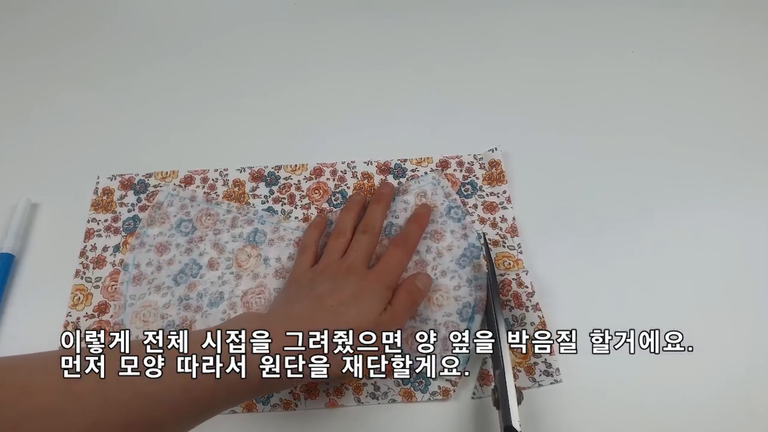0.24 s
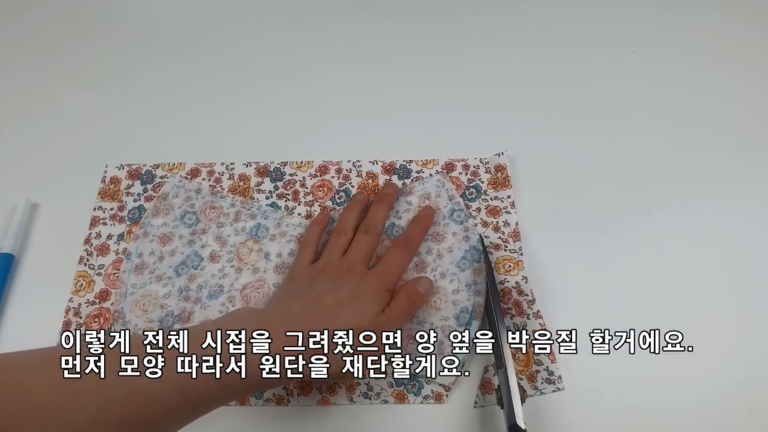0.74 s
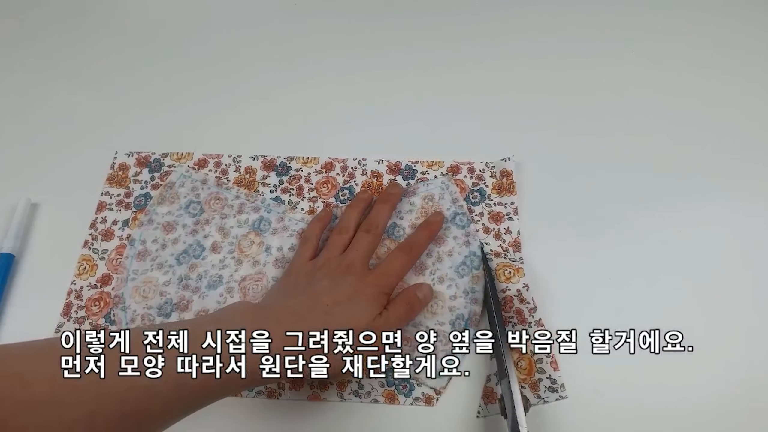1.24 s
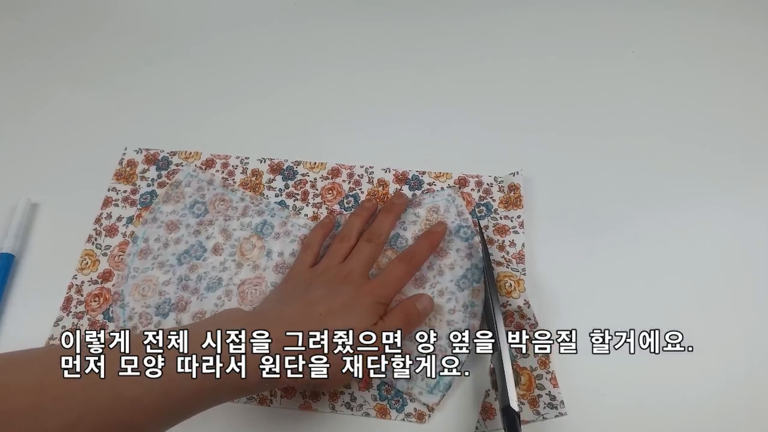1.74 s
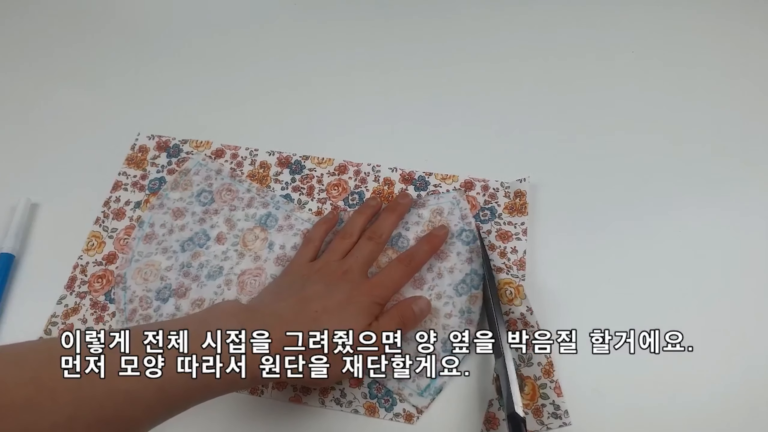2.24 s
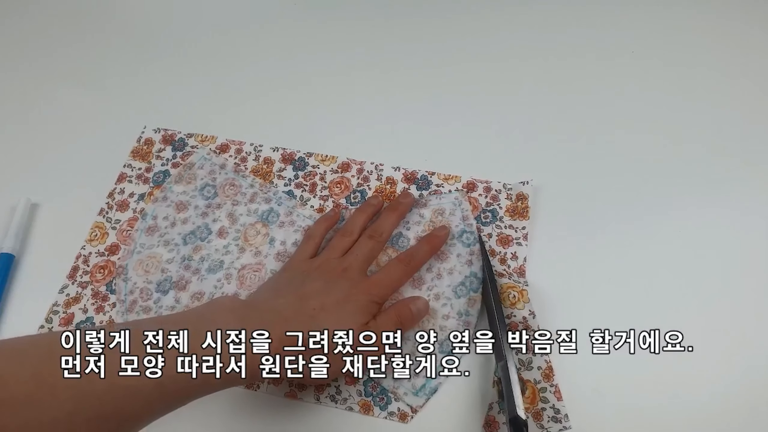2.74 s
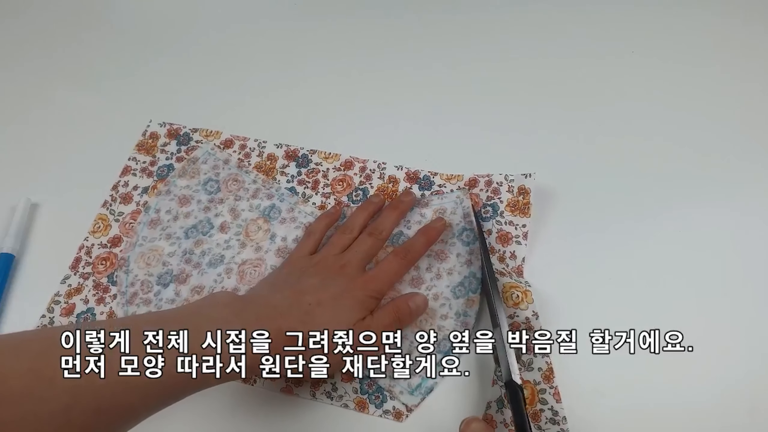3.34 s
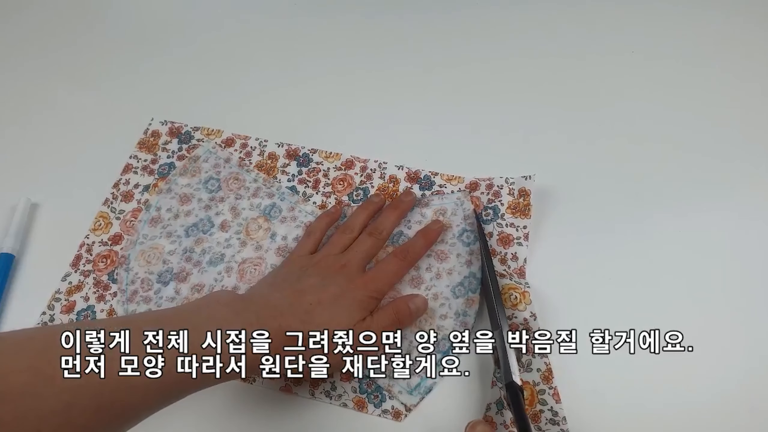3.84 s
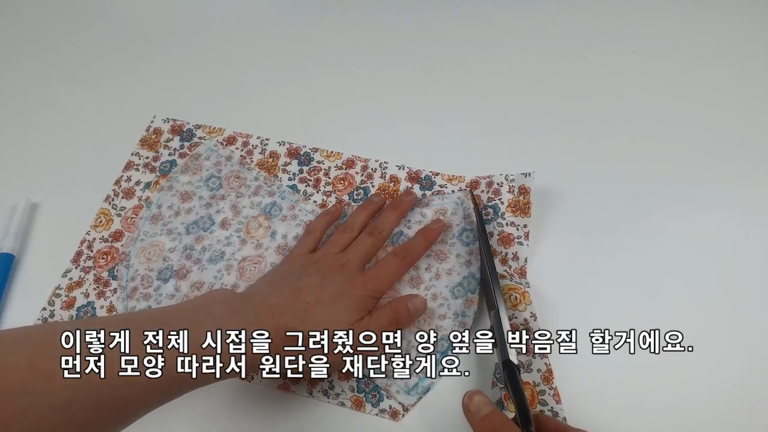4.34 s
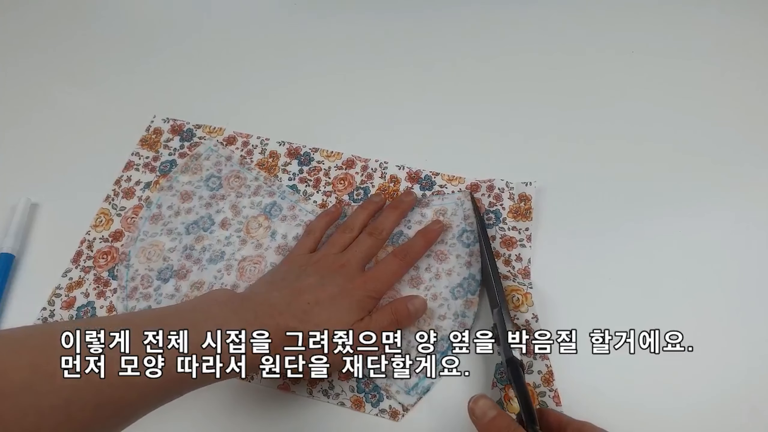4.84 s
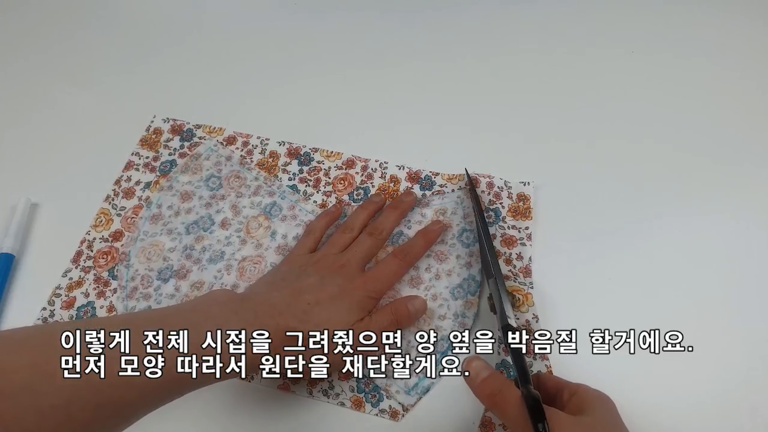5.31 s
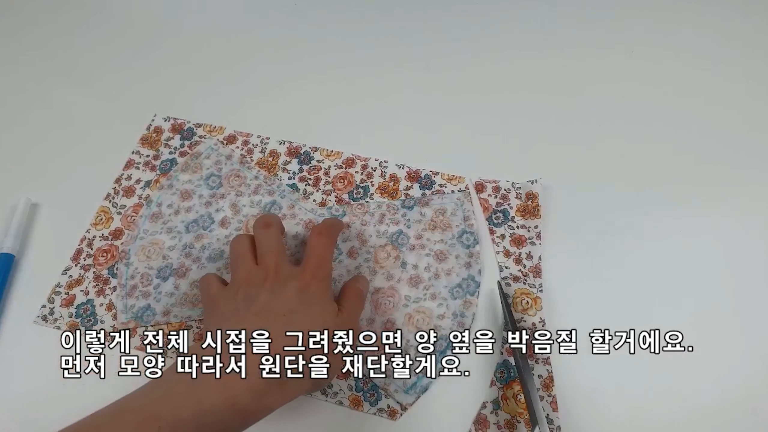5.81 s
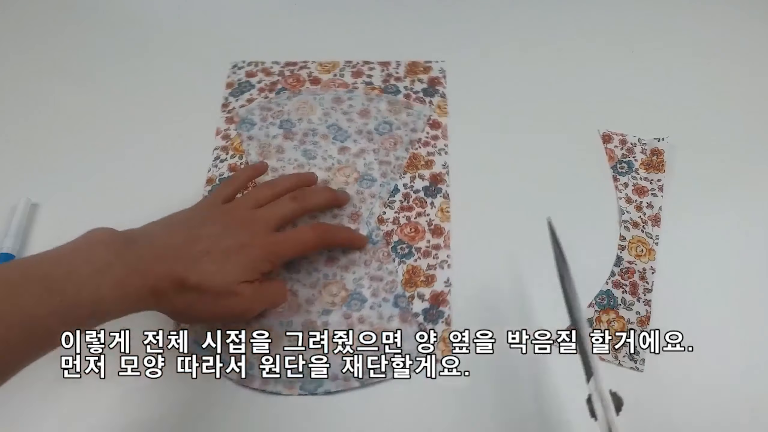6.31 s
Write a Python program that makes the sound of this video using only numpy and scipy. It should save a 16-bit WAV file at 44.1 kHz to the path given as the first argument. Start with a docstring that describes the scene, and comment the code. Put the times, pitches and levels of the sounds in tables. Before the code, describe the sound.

Close, uneven scissor cuts crackle through fabric and rattle a tabletop over low rumble, ending in a hard knock and a short cloth rub.

```python
"""A low rumble and puffs of air at the left port are heard first, over faint room hum and hiss.
Scissors on a hollow table then cut cotton in jerks: bursts of random thread snaps excite the damped modes
of table top and blades, with fibre crackle. Between cuts the blades reopen with a scrape and a knock.
Brushing and, near the end, sliding cloth are filtered noise; the rumble is noise around a low table mode."""
import sys
import numpy as np
from scipy import signal
from scipy.fft import rfft, irfft
from scipy.io import wavfile
from scipy.ndimage import uniform_filter1d

SR = 44100
rng = np.random.default_rng(int(sys.argv[2]) if len(sys.argv) > 2 else 0)


def transcribe(signal):
    """Save signal, clipped to [-1, 1], as a 16-bit WAV file at the path in sys.argv[1]."""
    frames = np.atleast_2d(signal).T
    limited = np.clip(frames, -1, 1)
    pcm = np.round(limited * 32767).astype(np.int16)
    wavfile.write(sys.argv[1], SR, pcm)


N = 289737
T = np.arange(N) / SR  # time [s]

# rumble of the lowest table mode: t/s, level/dB
RUMBLE_LEVEL = [(0.0, -41.5), (0.46, -70.5), (0.71, -49), (0.86, -64.5), (1.35, -45), (1.39, -61.5),
                (2.23, -54), (2.27, -55.5), (2.65, -46), (2.78, -59.5), (3.42, -64), (4.06, -47),
                (4.24, -65.5), (4.87, -52), (5.38, -63), (5.49, -39.5), (5.56, -55), (6.57, -50)]
# room spectrum: f/Hz, relative level/dB
ROOM_TONE = [(65, -36), (110, -2.5), (147, -24.5), (266, -17.5), (334, -34), (380, -19.5), (430, -33.5),
             (840, -33.5), (1500, -41), (2500, -44.5), (5200, -46), (7000, -56.5), (11500, -55),
             (13000, -73.5)]
# left-right correlation of the room sound: f/Hz, correlation [0 to 1]
ROOM_LIKENESS = [(100, .85), (300, .8), (1000, .4), (4000, .1), (15000, 0)]
ROOM_DB = -65.5  # rms
# puffs of air: t/s of centre, level/dB at the left port, f/Hz
AIR_PUFFS = [(.009, -32.5, 58), (0.071, -36, 60), (0.106, -34.5, 60), (0.149, -37.5, 59.5),
             (1.667, -35, 61.4), (1.73, -41, 59), (1.753, -34, 62.4), (1.8, -35.5, 81), (1.82, -33, 54.6),
             (2.11, -32.5, 62), (2.194, -43, 60.8), (3.23, -43, 58.5), (5.169, -41.5, 59.6),
             (6.378, -48, 60.6)]

# blades reopening: t/s of peak, scrape level/dB, knock level/dB (both as drive of the table)
OPENINGS = [(0.012, -43, -39.5), (1.454, -45.5, -40.5), (2.885, -53, -36.5), (4.233, -48.5, -41.5),
            (5.058, -50, -34)]
# colour of the opening scrape: blade ring, crackle, low thud [level/dB re table]
OPENING_COLOUR = [-22, -47, -5.5]
OPEN_RISE_S, OPEN_FALL_S = 60 / 724, 60 / 293
KNOCK_SWELL_S, KNOCK_DECAY_S, KNOCK_BRIGHT_DB = 0.0093, 0.005, -32  # time constants; brightness re table
# jerks of the blades: t/s of peak, table drive level/dB, brightness [dB re table], decay time constant [s]
JERKS = [(.632, -41.5, -33, 0.0045), (.675, -38, -21, 0.0058), (0.702, -59, -3, 0.013),
         (0.724, -45, -6, 0.0016), (0.876, -43, -35, 0.0046), (0.923, -47, -17, 0.017),
         (0.963, -35, -14, 0.0033), (1, -52, -2, .003), (1.063, -39.5, -10, 0.0034),
         (1.089, -46, -10, 0.0024), (1.145, -37.5, -10, 0.0034), (1.179, -29.5, -16, 0.0042),
         (1.214, -31.5, -12.5, 0.0067), (1.24, -31, -10.5, 0.0025), (1.273, -43, -8.5, 0.012),
         (1.305, -25.5, -10.5, 0.0059), (2.01, -38, -33, 0.0032), (2.035, -43, -9, 0.005),
         (2.099, -30, -21.5, 0.0043), (2.187, -42.5, -11.5, 0.0081), (2.348, -42.5, -16.5, 0.0057),
         (2.414, -30.5, -15.5, 0.0025), (2.445, -30.5, -19, 0.0058), (2.566, -30.5, -14, .0025),
         (2.595, -30, -19.5, 0.0043), (2.648, -27, -9.5, 0.0045), (2.704, -25, -9.5, 0.0041),
         (3.541, -45.5, -24, 0.0052), (3.68, -46, -9, 0.0027), (3.754, -34, -13, 0.0011),
         (3.769, -42, -9, 0.0059), (3.793, -37.5, -8.5, 0.0026), (3.849, -36.5, -12, 0.0069),
         (3.894, -38.5, -11.5, 0.0039), (3.923, -42, -4, 0.0036), (3.949, -30.5, -9, 0.0045),
         (3.967, -48, -7, .003), (3.989, -28, -12.5, 0.0034), (4.017, -42, -5.5, 0.0021),
         (4.05, -28.5, -12.5, 0.0017), (4.11, -39, -5, 0.0016), (4.702, -44, -21.5, 0.0073),
         (4.767, -27.5, -17, 0.0026), (4.781, -41.5, -16, 0.028), (4.82, -34.5, -15, 0.0075),
         (4.846, -22, -15, 0.0019), (4.878, -23.5, -14.5, 0.0066), (4.91, -29.5, -8.5, 0.0044),
         (5.414, -22, -44, 0.0024), (5.463, -18.5, -20.5, 0.0055)]
JERK_SWELL_S, CRACKLE_DB, THUD_DB = .0022, -6, -16.5  # crackle re blade ring, low thud re table
# closing strokes, shearing steadily under the jerks: t/s of start, length [s],
# table drive level/dB at start and at end, blade ring, fibre crackle and low thud [level/dB re table]
STROKES = [(.64, 0.081, -52.5, -48, -12.5, -26, -7.5), (.781, 0.062, -50, -58.5, -12, -35, -17),
           (0.849, 0.13, -58.5, -48.5, -6, -30, -13), (1.056, 0.3, -63, -52, -8, -17, -8),
           (1.974, 0.098, -49.5, -58.5, -16, -27, -5.5), (2.093, 0.09, -57, -55.5, -7, -24, -15),
           (2.345, .1, -66, -57, -11, -22, -5), (2.561, 0.17, -58, -50, -13.5, -20, -8),
           (3.51, 0.042, -70.5, -60, -19.5, -39, -3), (3.67, 0.025, -65, -68, -6.5, -33, -11),
           (3.754, 0.027, -53.5, -56.5, -6, -25, 4.5), (3.849, 0.176, -62, -48.5, -9.5, -12, -2.5),
           (4.64, 0.071, -66, -61.5, -28, -32, -8), (4.703, 0.025, -61, -61.5, -11, -28, -1),
           (4.762, 0.12, -53, -40.5, -10, -12, -3), (5.376, 0.022, -59.5, -53, -9.5, -26, 4),
           (5.412, 0.048, -34, -29, -15, -14.5, -12)]
BITE_S, LET_GO_S = 60 / 1999, 60 / 379
# single blows (blade tips meet, a tick, a hand lands):
# t/s, impulse level/dB into table top, blades, air, low modes
BLOWS = [(5.468, 3, 1.5, -3.5, -11.5), (5.854, -54, -43.5, -54, -48), (5.942, -11, -49.5, -67, -7.5)]
# rubbing heard through the table: t/s, drive level/dB
RUBBING = [(5.96, -38), (6.034, -54), (6.16, -52.5), (6.208, -58.5), (6.364, -59.5), (6.558, -75.5),
           (6.57, -71.5)]
# table-top modes: nominal f/Hz, relative level/dB, t60 [s], lean to the left port
# (in all mode tables, beyond +-1 the ports move in opposite phase)
TABLE_MODES = [(618, -17.5, 0.18, 0.3), (530, -3, 0.031, 0.091), (638, -6.5, 0.13, -1.4),
               (708, -4, 0.22, 1), (759.2, 6, 0.13, 0.18), (790, 6, 0.12, -.4), (784, 10.5, 0.023, 0.23),
               (955, -3, 0.057, -0.14), (982, 9, 0.036, -0.59), (1102, 3, 0.049, -0.01),
               (1124, 0.5, 0.068, -0.72), (1212, 8.5, 0.014, -.3), (1288, -3.5, 0.12, .2),
               (1508, -17, 0.039, -0.018), (1524, -5, 0.059, .2), (1720, -10.5, 0.042, .2)]
# low modes of the table: nominal f/Hz, relative level/dB, t60 [s], lean to the left port
LOW_MODES = [(139.5, -2.5, .1, -0.02), (207.6, 4, 0.26, .05), (280.5, -2.5, 0.12, .05),
             (332, -3.5, .15, -0.067), (499.8, -3, 0.15, .2)]
# blade modes: nominal f/Hz, relative level/dB, t60 [s] (3 ms at least when rung), lean to the left port
BLADE_MODES = [(2204, -3.5, 0.012, 0.14), (2250, -10, 0.0025, -0.57), (2685, 5.5, 0.011, 0.047),
               (2980, 7, 0.011, -0.23), (3350, -3.5, 0.016, .2), (4450, -2.5, 0.0042, 0.54),
               (4870, -1, 0.0089, 0.26), (5000, 2, 0.014, 0.23), (6682, -6, 0.0031, .3)]
# fibre crackle spectrum: f/Hz, relative level/dB
CRACKLE_TONE = [(1060, -56.5), (1800, 0.5), (1990, -17.5), (2850, 0.5), (3570, -13.5), (4670, -2.5),
                (5540, -32), (7530, -1.5), (11500, -2.5), (13900, -1), (15500, -24.5)]

# faint brushing while the cloth is nudged round between cuts: t/s of peak, level/dB
BRUSHES = [(.25, -72.5), (1.6, -73), (3.1, -77), (5.26, -74.5)]
# brushing spectrum: f/Hz, relative level/dB
BRUSH_TONE = [(1500, -4.5), (3000, -13), (6000, -6), (8000, -11), (15000, -24.5)]
BRUSH_RISE_S, BRUSH_FALL_S = 60 / 39, 60 / 58.5
# hiss of cloth sliding: t/s, level/dB
SLIDE_LEVEL = [(5.92, -85), (5.934, -86), (5.946, -71), (6.006, -56.5), (6.144, -55.5), (6.226, -61),
               (6.408, -59.5), (6.434, -69), (6.5, -87.5)]
# sliding spectrum: f/Hz, relative level/dB
SLIDE_TONE = [(710, -43), (1200, -1.5), (1570, 0.5), (2560, -5.5), (3460, -6.5), (13300, -13.5),
              (14800, -18.5), (15500, -53.5)]
EDGE_HZ = 15300  # upper band limit


def amp(db):
    """Amplitude ratio of a level: 20 dB is a factor of ten."""
    return 10 ** (np.asarray(db) / 20)


def evened(x):
    """Normalization to unit root-mean-square."""
    return x / np.sqrt(np.mean(x ** 2) + 1e-20)


def read(points, hz):
    """Interpolation on a logarithmic frequency axis."""
    f, value = np.transpose(points)
    return np.interp(np.log(hz + 1), np.log(f + 1), value)


def add(mix, s, sound):
    """Superposition: a sound is added in place from time s, trimmed to the mix."""
    start = round(s * SR)
    sound = sound[..., max(-start, 0):]
    part = mix[..., max(start, 0):][..., :sound.shape[-1]]
    part += sound[..., :part.shape[-1]]


def curve(rows):
    """Envelope linear in decibels between its points, silent outside them, then smoothed."""
    s, db = np.transpose(rows)
    inside = (T >= s[0]) * (T <= s[-1])
    return uniform_filter1d(amp(np.interp(T, s, db)) * inside, size=300)


def swell(start, length, from_db, to_db, rise_s, fall_s):
    """Exponential growth up to the start, a drift while it holds, then exponential decay."""
    end = start + max(length, 1e-4)
    return curve([(start - rise_s, from_db - 61), (start, from_db), (end, to_db), (end + fall_s, to_db - 60)])


def coloured(x, tone):
    """Linear filtering: shapes the spectrum, keeping unit power for unit white noise."""
    gain = amp(read(tone, np.fft.rfftfreq(N, 1 / SR)))
    return irfft(rfft(x) * evened(gain), N)


def rumble():
    """Resonance under random drive: the lowest table mode, kept going by hands, blades and building tremor."""
    common, opposed = rng.standard_normal((2, N))
    hz = np.fft.rfftfreq(N, 1 / SR)
    resonance = 1 / (1 + ((hz - 88) / 14) ** 2)
    ports = np.array([common + .2 * opposed, common - .2 * opposed])
    return evened(irfft(rfft(ports) * resonance, N)) * curve(RUMBLE_LEVEL)


def room():
    """Partial coherence: hum and hiss share part of their noise between ports, in drifting patches."""
    frames, hz = N // 256 + 5, np.fft.rfftfreq(1024, 1 / SR)
    a, b, c, d, patches = rng.standard_normal((frames, 513, 5)).T
    patches = uniform_filter1d(patches, size=8, axis=0)  # over frequency
    patches = evened(uniform_filter1d(patches, size=10, axis=1))  # over time
    same = read(ROOM_LIKENESS, hz)[:, None]
    left, other = a + 1j * b, c + 1j * d
    spectra = np.array([left, same * left + np.sqrt(1 - same ** 2) * other])
    spectra *= amp(read(ROOM_TONE, hz)[:, None] + 1.7 * patches) * (hz > 60)[:, None]
    noise = signal.istft(spectra, nperseg=1024, noverlap=768)[1][:, :N]
    return amp(ROOM_DB) * evened(noise)


def puffs():
    """Forced motion: each puff swings the left diaphragm for about two cycles, the right a tenth as far."""
    out = np.zeros((2, N))
    for s, db, hz in AIR_PUFFS:
        u = np.linspace(-1, 1, round(2.6 * SR / hz))
        swing = -np.cos(np.pi * 2.6 * u) * np.cos(np.pi * u / 2) ** 2
        add(out, s - len(u) / SR / 2, amp(db) * swing * np.array([[1], [.1]]))
    return out


def force():
    """Impulsive force: each knock or jerk swells and decays exponentially, as table and bright gains."""
    out, t = np.zeros((2, N)), np.arange(-SR // 20, SR // 10) / SR
    rows = [(s, db, KNOCK_BRIGHT_DB, KNOCK_DECAY_S, KNOCK_SWELL_S) for s, _, db in OPENINGS]
    rows += [(*row, JERK_SWELL_S) for row in JERKS]
    for s, db, bright_db, decay, rise in rows:
        shape = np.exp(np.where(t < 0, t / rise, -t / decay))
        add(out, s + t[0], amp(db) * shape * amp([[0], [bright_db]]))
    return out


def shearing():
    """Steady friction of openings and strokes, as gains into table, blades, air and low modes."""
    out = np.zeros((4, N))
    for s, db, _ in OPENINGS:
        scrape = swell(s, 0, db, db, OPEN_RISE_S, OPEN_FALL_S)
        out += scrape * amp([0] + list(OPENING_COLOUR))[:, None]
    for s, length, from_db, to_db, *colour_db in STROKES:
        stroke = swell(s, length, from_db, to_db, BITE_S, LET_GO_S)
        out += stroke * amp([0] + colour_db)[:, None]
    return out


def blows(column):
    """Impulse excitation: one unit sample, scaled, for each blow."""
    out = np.zeros(N)
    for s, *db in BLOWS:
        add(out, s, amp(db[column]) * np.ones(1))
    return out


def thread_snaps():
    """Shot noise: threads snap one by one at random, about 7000 a second, with uneven strength."""
    size = amp(2.0 * rng.exponential(1, N)) * (rng.random(N) < 7000 / SR)
    return evened(size * rng.standard_normal(N))


def ring(drive, modes, spread_db, detune, count=7):
    """Modal superposition: damped modes at both ports, several mixes taking turns as the contact wanders."""
    t, out = np.arange(SR // 3) / SR, np.zeros((2, N))
    share = np.abs(uniform_filter1d(rng.standard_normal((count, N)), size=1500, axis=1)) ** 4
    share /= np.linalg.norm(share, axis=0)
    # the first wave spreads away from the contact before the ringing settles
    early = 1 + 0.42 * np.exp(-t / 0.00089)
    for part in share:
        response = np.zeros((2, len(t)))
        for k, (hz, db, t60, lean) in enumerate(modes):
            gain, shift = rng.standard_normal(2)
            t60 = max(t60, .003)
            decay = amp(db + spread_db * gain - 60 * t / t60)
            mode = decay * np.sin(2 * np.pi * hz * (1 + detune * shift) * t)
            response += (-1) ** k * early * mode / np.sqrt(t60) * np.array([[1 + lean], [1 - lean]])
        response /= np.linalg.norm(response.mean(0))
        out += signal.oaconvolve((drive * part)[None], response, axes=1)[:, :N]
    return out


def table_top(snaps, gain, rub):
    """Low-pass excitation: the cloth cushions the push on the ringing table top."""
    cushion = signal.butter(3, 1700, fs=SR)
    soft = signal.lfilter(*cushion, snaps)
    # level the noise over a few milliseconds, so each jerk's loudness follows its table value
    soft *= .27 / np.sqrt(uniform_filter1d(soft ** 2, size=150) + 1e-9)
    push = soft * gain + signal.lfilter(*cushion, blows(0))
    # a soft palm rubs duller still
    push += amp(-2.5) * signal.lfilter(*signal.butter(3, 750, fs=SR), rub)
    return ring(push, TABLE_MODES, 3, .012)


def fibre_crackle(drive):
    """Propagation delay: filtered snaps reach the right port one sample later and weaker."""
    crackle = coloured(drive, CRACKLE_TONE)
    # ports about a centimetre apart
    return np.array([crackle, np.roll(crackle, 1)]) * amp([[2.5], [-2.5]])


def echoes(t60):
    """Early reflection from nearby surfaces: sparse decaying taps of random sign, different at each port."""
    taps = np.zeros((2, SR // 4))
    slots = np.arange(60, SR // 4 - 20, 20)
    at = slots + rng.integers(0, 20, (2, len(slots)))
    np.put_along_axis(taps, at, rng.choice([-1., 1.], at.shape), 1)
    taps *= amp(-60 * np.arange(SR // 4) / SR / t60)
    return taps / np.linalg.norm(taps[0])  # unit energy at the left port


def reflected(x, t60):
    """Reverberation by convolution with the echoes."""
    return signal.oaconvolve(x[None], echoes(t60), axes=1)[:, :N]


def cutting():
    """Common excitation: the same thread snaps drive table top, low modes, blades and air."""
    jerk, jerk_bright = force()
    shear, shear_ring, shear_crackle, shear_thud = shearing()
    snaps = thread_snaps()
    rub = rng.standard_normal(N) * curve(RUBBING)
    table = table_top(snaps, jerk + shear, rub)
    thud = snaps * (amp(THUD_DB) * jerk + shear_thud)
    low = ring(thud + blows(3) + amp(-7.5) * rub, LOW_MODES, 2, .005, count=2)
    # the weave resists unevenly
    judder = amp(5.0 * evened(uniform_filter1d(rng.standard_normal(N), size=500)))
    scrape = snaps * (jerk_bright + shear_ring * judder)
    blades = ring(scrape + blows(1), BLADE_MODES, 3.5, .045)
    tearing = snaps * (amp(CRACKLE_DB) * jerk_bright + shear_crackle * judder)
    bright = blades + fibre_crackle(tearing + blows(2))
    wet = reflected(bright[0], 0.13) * amp([[-3], [-5]])
    boom = amp(-6.0) * reflected(table.mean(0), 0.12)
    return table + low + boom + bright + wet


def sliding():
    """Friction noise: cloth on the table top hisses with a wavering grain, partly shared by the ports."""
    shared, right_only, waver = rng.standard_normal((3, N))
    grain = amp(.8 * evened(uniform_filter1d(waver, size=900)))
    pair = np.array([shared, .5 * shared + 0.26 * right_only]) * grain
    brush = sum(swell(s, 0, db, db, BRUSH_RISE_S, BRUSH_FALL_S) for s, db in BRUSHES)
    return coloured(pair, BRUSH_TONE) * brush + coloured(pair, SLIDE_TONE) * curve(SLIDE_LEVEL)


def scene():
    """Linear superposition of all sources at the two ports."""
    return rumble() + room() + puffs() + cutting() + sliding()


def record(dry):
    """Band limitation: the microphone drops the deepest bass, then a low-pass sets the upper edge."""
    lean = signal.lfilter(*signal.butter(2, 35, "high", fs=SR), dry)
    lowpass = signal.firwin(511, EDGE_HZ, window=("kaiser", 9), fs=SR)
    return signal.oaconvolve(lean, lowpass[None], "same")


dry = scene()
out = record(dry)
transcribe(out)
```